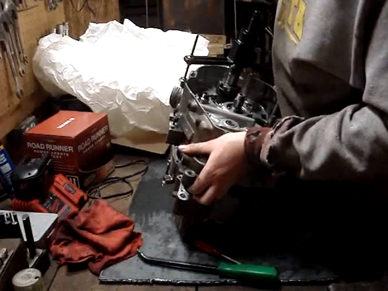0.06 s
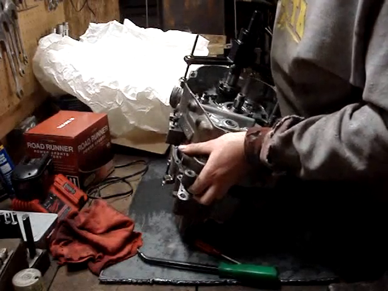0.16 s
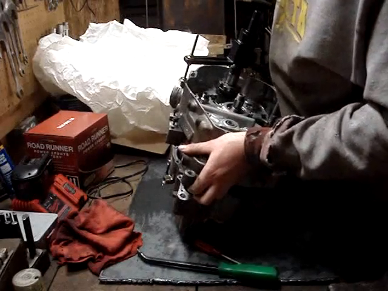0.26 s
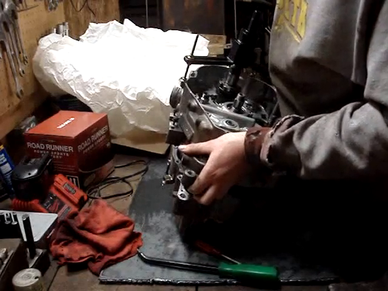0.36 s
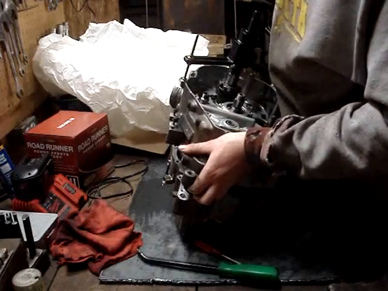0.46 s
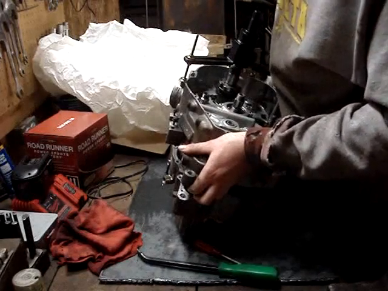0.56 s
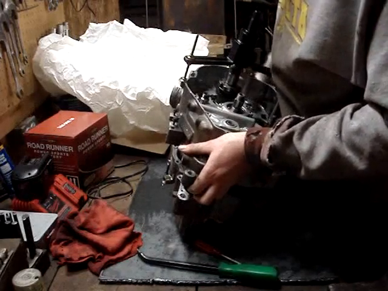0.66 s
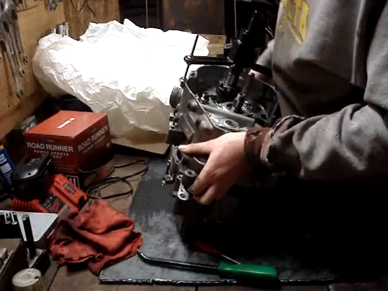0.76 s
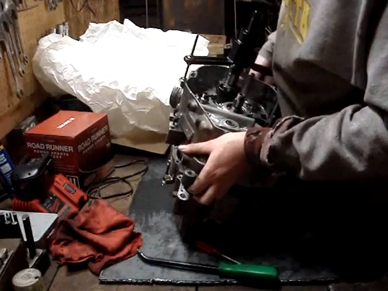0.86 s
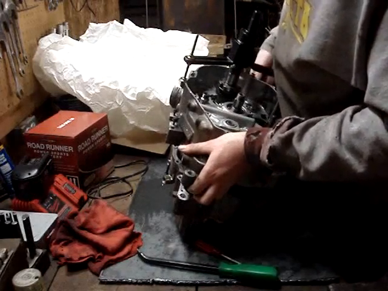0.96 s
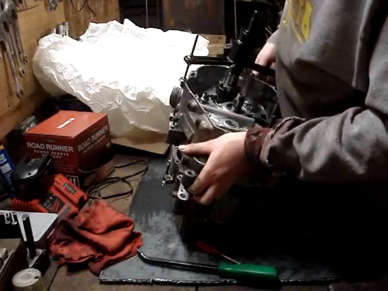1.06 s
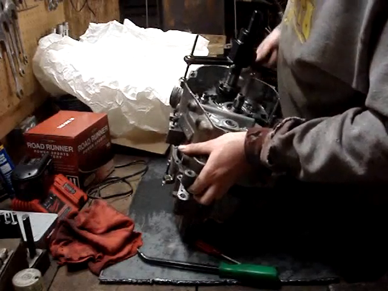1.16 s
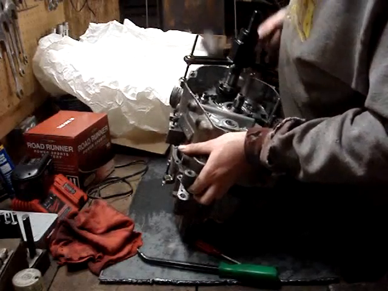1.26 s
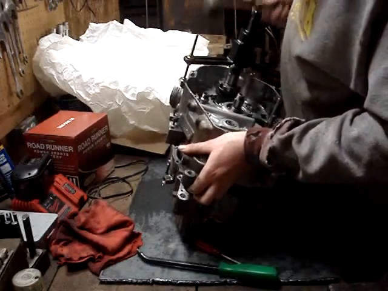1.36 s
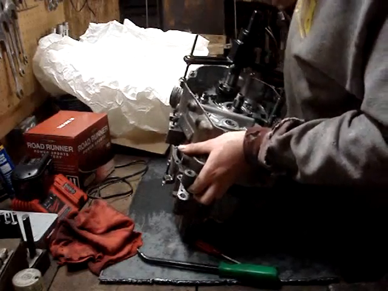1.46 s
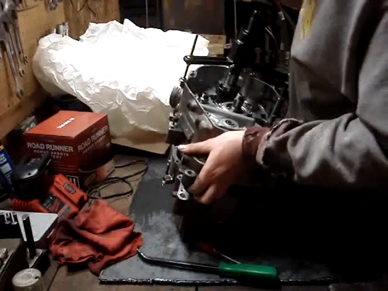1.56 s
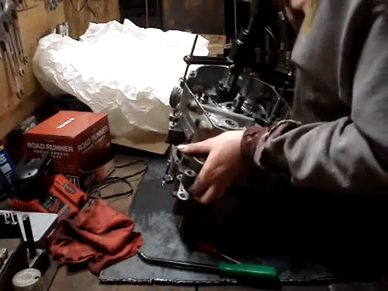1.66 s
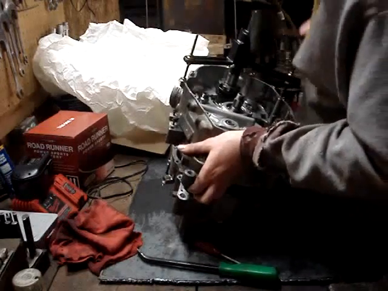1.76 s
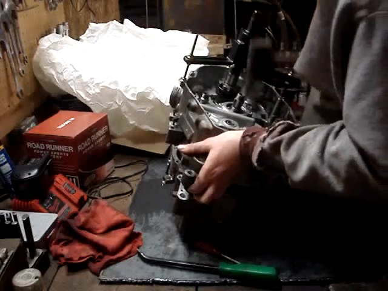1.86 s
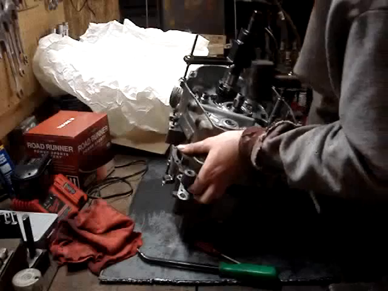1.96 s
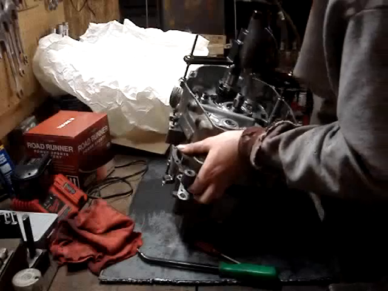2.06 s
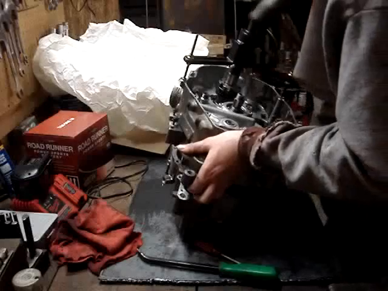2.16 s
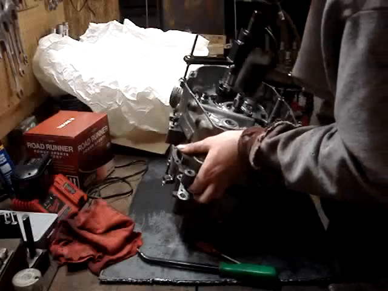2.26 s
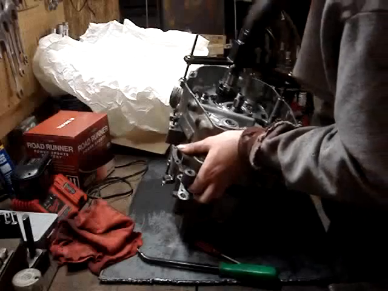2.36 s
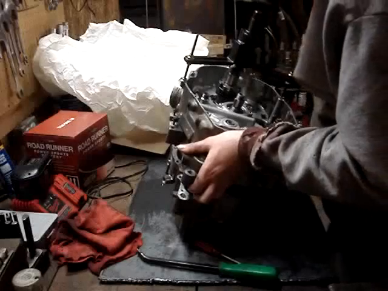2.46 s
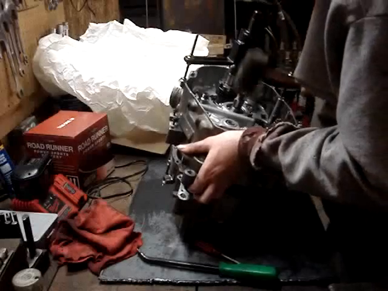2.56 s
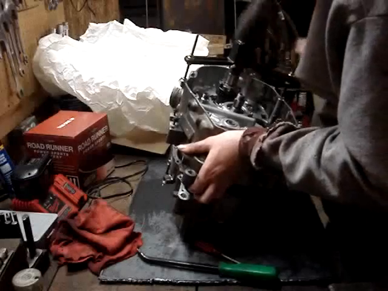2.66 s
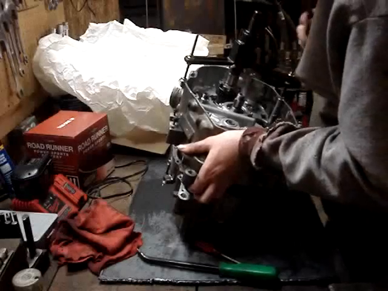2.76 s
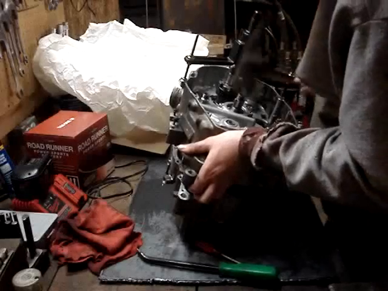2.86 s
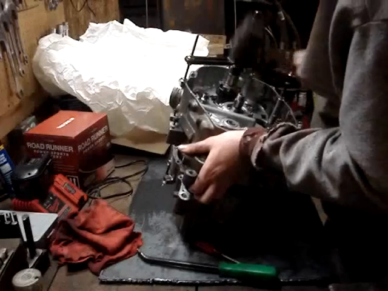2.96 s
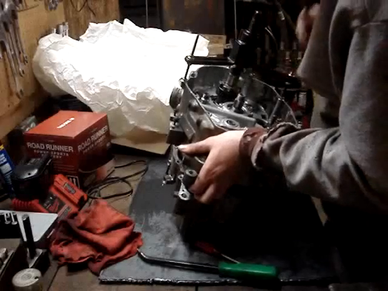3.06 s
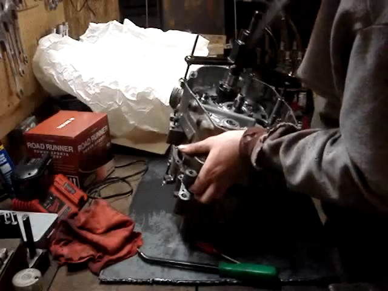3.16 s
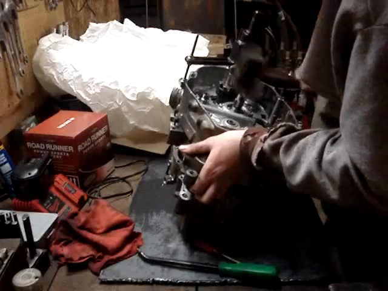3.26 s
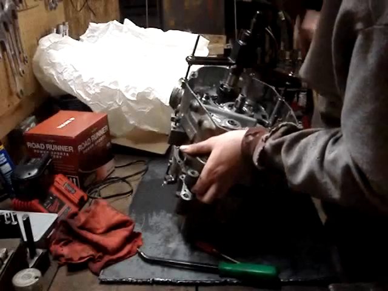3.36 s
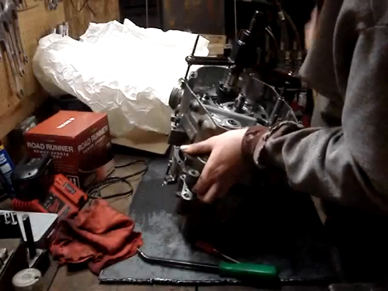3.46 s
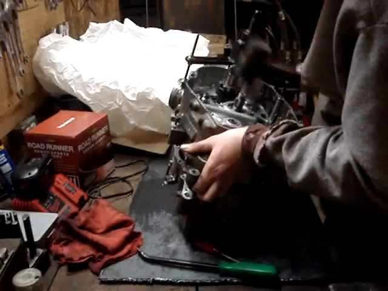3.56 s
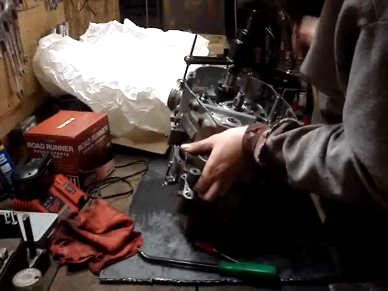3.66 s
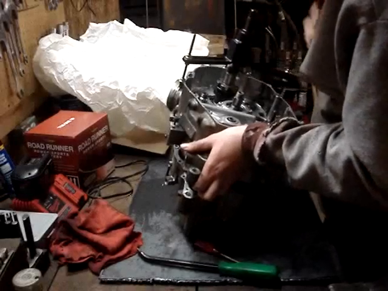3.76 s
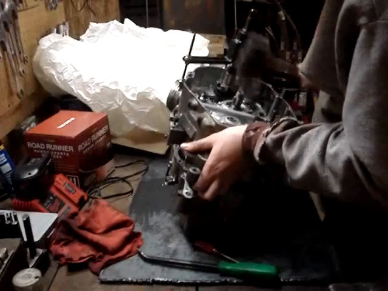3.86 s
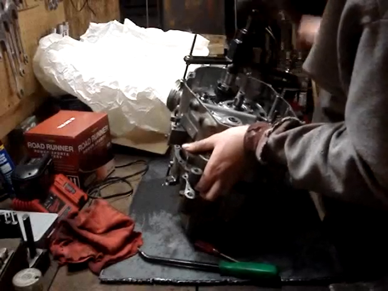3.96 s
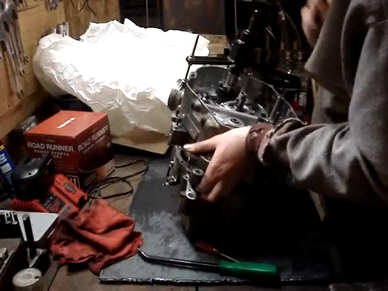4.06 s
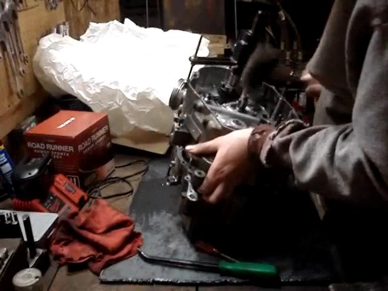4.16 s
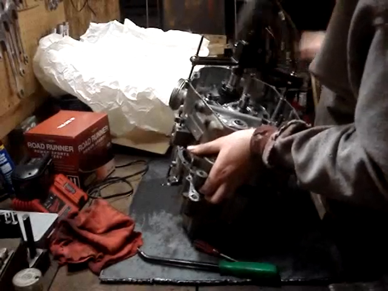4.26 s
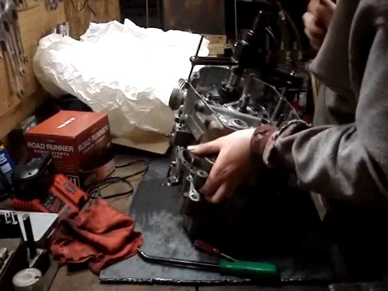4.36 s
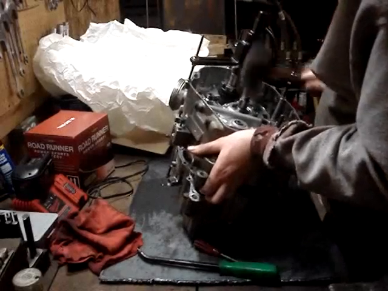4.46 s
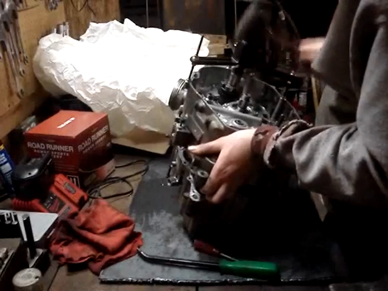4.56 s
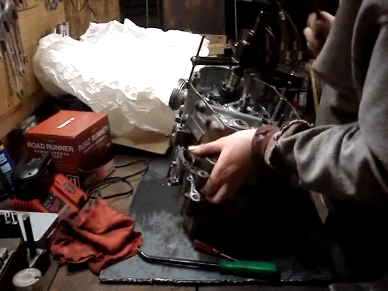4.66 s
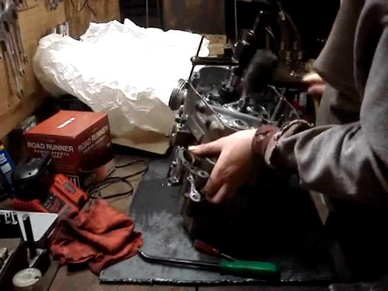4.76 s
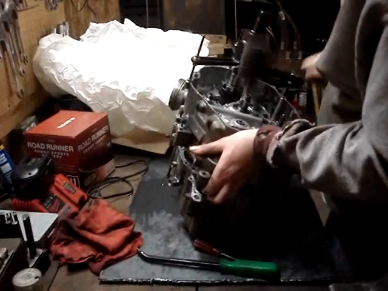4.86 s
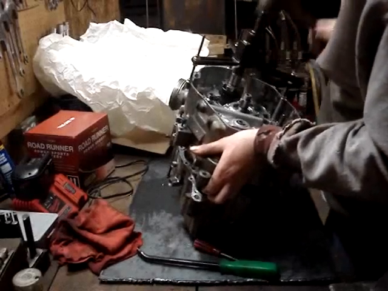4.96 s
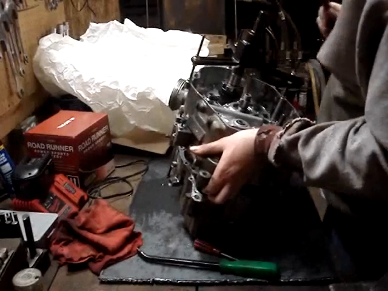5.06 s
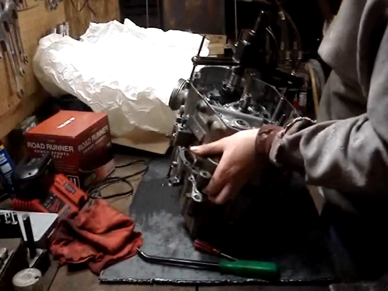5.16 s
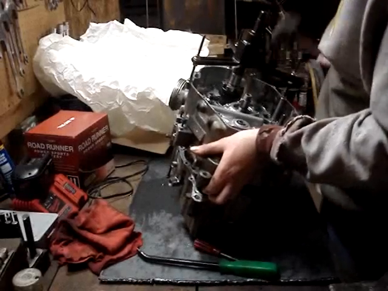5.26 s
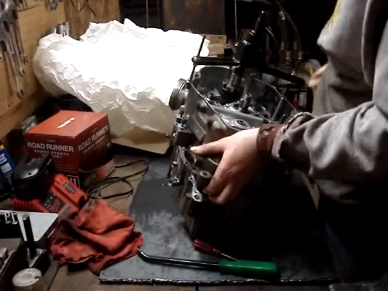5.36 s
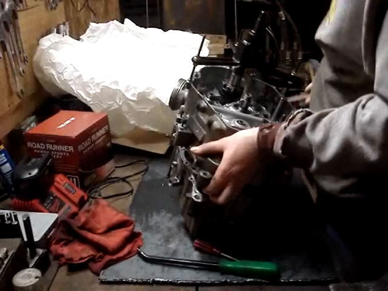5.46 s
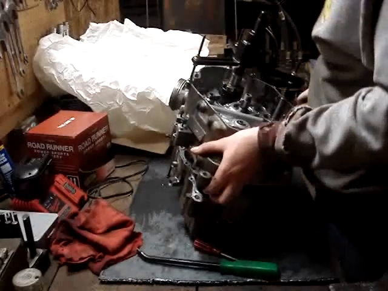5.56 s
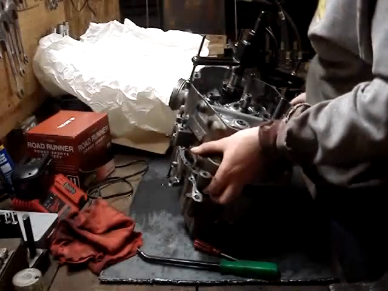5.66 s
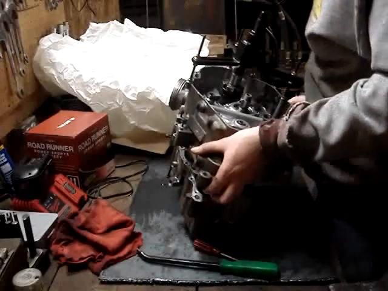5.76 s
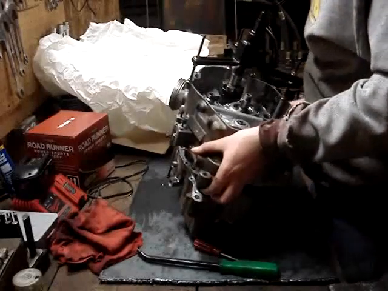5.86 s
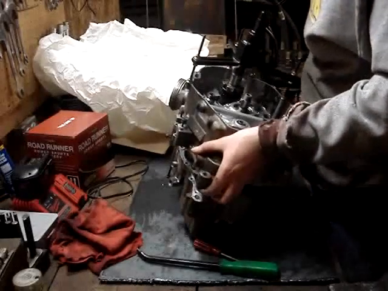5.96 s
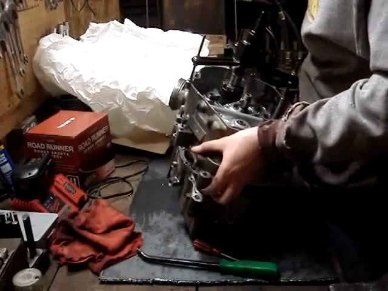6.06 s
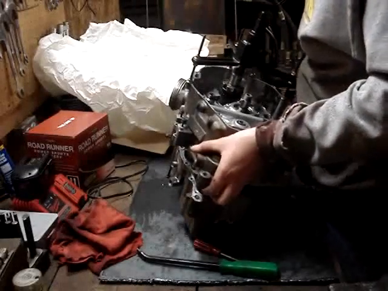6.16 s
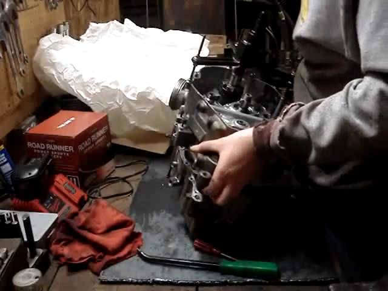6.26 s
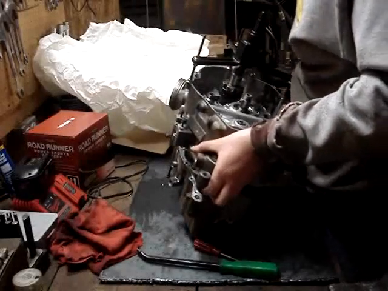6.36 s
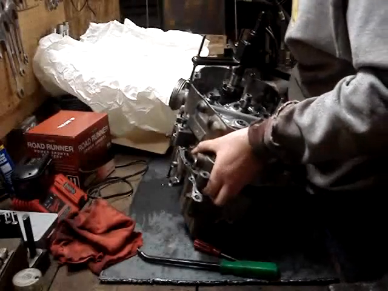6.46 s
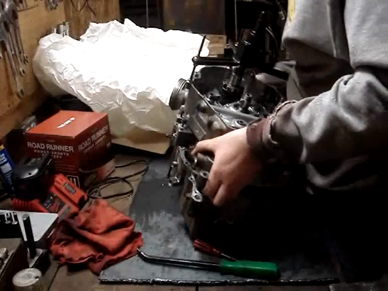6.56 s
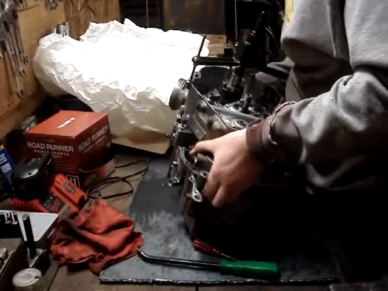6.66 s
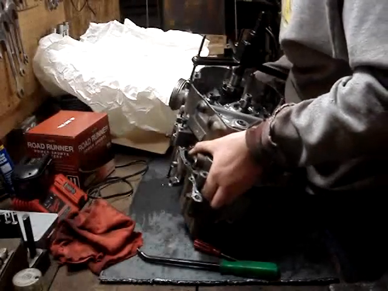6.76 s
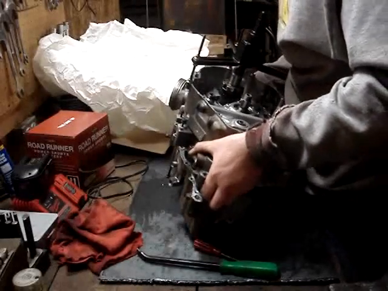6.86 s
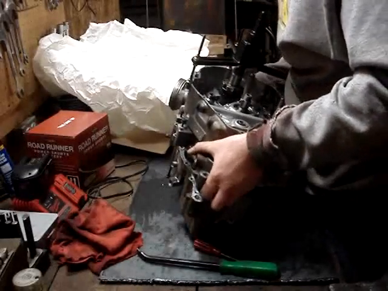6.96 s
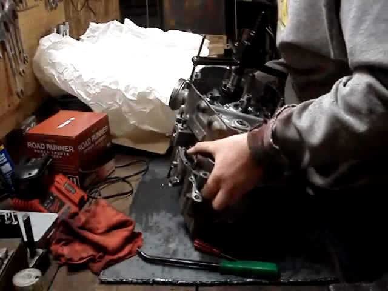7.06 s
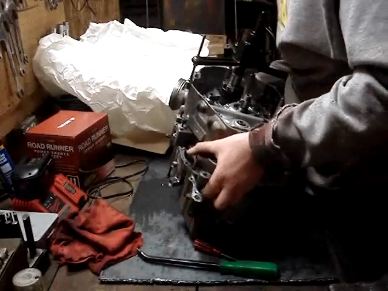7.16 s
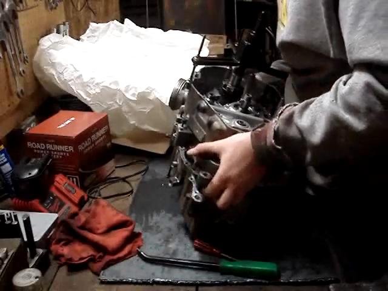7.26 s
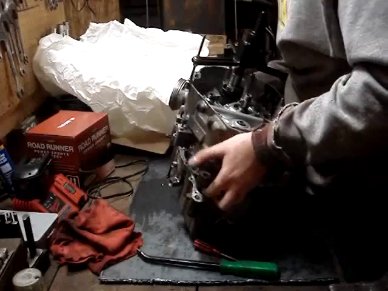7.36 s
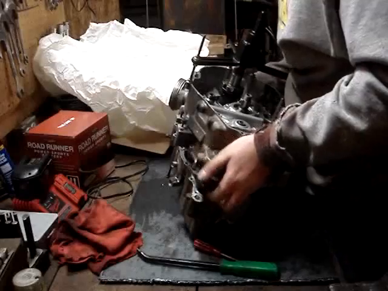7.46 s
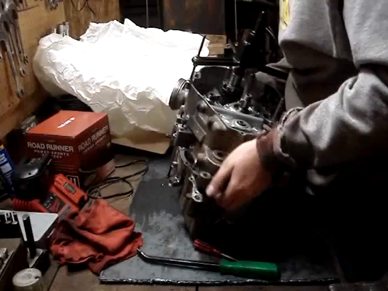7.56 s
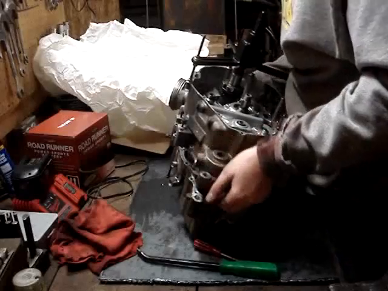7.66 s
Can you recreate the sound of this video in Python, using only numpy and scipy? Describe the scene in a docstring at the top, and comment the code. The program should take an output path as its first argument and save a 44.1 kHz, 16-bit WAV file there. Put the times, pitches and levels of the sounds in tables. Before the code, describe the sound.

In a garage with a steady hum of air, a hammer clinks twice as it is picked up, and an engine casing is bumped with a clatter. Nine hammer blows follow, about three a second, each knocking the metal, rattling loose steel parts and ringing through the room. The hammer is then put down with a clatter. One microphone at the workbench ducks at the loud hits and slowly recovers.

```python
"""A steady hum of air fills a garage, heard through one camera microphone at the workbench.
A hammer clinks twice as it is picked up, and an open engine casing is bumped. Nine hammer blows follow,
about three a second: each knocks the casing, sets loose steel parts chattering and rings through the
room. Then the hammer is put down with a clatter.
The camera's gain control ducks at every loud hit and recovers slowly."""
import numpy as np
from scipy import signal
from scipy.fft import rfft, irfft, next_fast_len
from scipy.io import wavfile
from scipy.ndimage import map_coordinates
import sys
import numpy as np
from scipy import signal
from scipy.fft import rfft, irfft, next_fast_len
from scipy.io import wavfile
from scipy.ndimage import map_coordinates

SR = 44100
rng = np.random.default_rng(int(sys.argv[2]) if len(sys.argv) > 2 else 0)


def generate_wav(signal):
    """Clip the signal to [-1, 1] and save it as 16-bit WAV at the path in sys.argv[1]."""
    frames = np.transpose(np.atleast_2d(signal))
    scaled = np.clip(frames, -1, 1) * 32767
    pcm = np.round(scaled).astype(np.int16)
    wavfile.write(sys.argv[1], SR, pcm)


N = 339834
HIT_SAMPLES = 2 ** 15  # one hit and its tail
T, HZ = np.arange(HIT_SAMPLES) / SR, np.fft.rfftfreq(HIT_SAMPLES, 1 / SR)
TOP_HZ = 10060  # the camera's band limit


def amp(db):
    """Decibels to gain."""
    return 10 ** (np.asarray(db) / 20)


def unit_rms(x):
    """x scaled to rms 1."""
    return x / np.sqrt(np.mean(x ** 2) + 1e-20)


def along(points, hz):
    """A curve of (frequency_hz, value) points, read on a log frequency axis."""
    frequencies, values = np.transpose(points)
    return np.interp(np.log(hz + 1), np.log(frequencies + 1), values)


def resonances(peaks, hz):
    """Gain of narrow peaks standing on a flat response."""
    power = sum(abs(amp(db) ** 2 - 1) / (1 + (2 * (hz - pitch) / width) ** 2)
                for pitch, width, db in peaks)
    return np.sqrt(1 + power)


def noise(colour):
    """Noise of rms 1 below the band limit, shaped by a gain at each frequency."""
    size = 2 * (len(colour) - 1)
    in_band = np.fft.rfftfreq(size, 1 / SR) < TOP_HZ
    return unit_rms(irfft(rfft(rng.standard_normal(size)) * colour * in_band, size))


def mode(hz, t60_s):
    """One damped vibration, falling 60 dB in t60_s."""
    return np.sin(2 * np.pi * hz * T) * amp(-60 * T / t60_s)


def attack(rise_s):
    """An envelope rising smoothly from 0 to 1."""
    return 1 - np.exp(-T / rise_s)


def add(track, start_s, sound):
    """Mix a sound into the track."""
    part = track[round(start_s * SR):][:len(sound)]
    part += sound[:len(part)]


# Spectrum of the air in the garage: frequency_hz, level_db
AIR_SPECTRUM = [(28, -9), (55, -21.5), (100, -11), (140, -15), (200, -5), (290, 1.5), (420, -1), (950, -1),
                (1300, -3.5), (2000, -8.5), (5000, -20), (10000, -36)]
# Room modes that the air excites: pitch_hz, width_hz, boost_db
ROOM_MODES = [(316.4, 17, 5.5), (558, 8.2, 5.5), (857, 47, 3)]

def air(level_db=-34.5):
    """Room tone all around the microphone: moving air, coloured by the garage's modes."""
    hz = np.fft.rfftfreq(2 * next_fast_len(N // 2 + 1), 1 / SR)
    colour = amp(along(AIR_SPECTRUM, hz)) * resonances(ROOM_MODES, hz)
    return amp(level_db) * noise(colour)[:N]


# Reverberation time of the garage: frequency_hz, t60_s
GARAGE_DECAY = [(60, 0.15), (200, 0.77), (600, 0.89), (1500, 0.8), (3000, 0.76), (5000, 0.59), (7000, 0.48),
                (10000, 0.29)]

def room_decay(x, start_s=0):
    """From start_s on, each frequency of x fades at the garage's own rate."""
    hz, t, spectrum = signal.stft(x, SR, nperseg=256)
    fade = amp(-60 * np.maximum(t - start_s, 0) / along(GARAGE_DECAY, hz)[:, None])
    return signal.istft(spectrum * fade, SR, nperseg=256)[1][:len(x)]


def in_room(x, wet_db):
    """The direct sound from the bench, then the answer of the walls farther off."""
    tail = room_decay(rng.standard_normal(HIT_SAMPLES)) * attack(0.03)
    return x + amp(wet_db) * signal.fftconvolve(x, tail / np.linalg.norm(tail))[:len(x)]


# The hammer's modes, in two families that answer to where it is touched:
# pitch_hz, t60_s, beat_depth (0-1), level_db, family (0 or 1)
HAMMER_MODES = [(668, .25, .2, -15, 0), (910, .33, .5, 1, 0), (2285, .7, .3, -8, 0), (1100, .015, 0, 8, 1),
                (1200, .72, .95, -.5, 1), (1265, .17, .1, -3, 1), (2686, .5, .3, -23, 1)]
# The hammer touching steel as it is lifted and laid down: start_s, tick_db, family_0_db, family_1_db
HAMMER_TOUCHES = [(0.543, -22, -23, -47), (0.828, -25.5, -25, -17), (6.312, -22.5, -24, -21)]

def hammer_clinks(beat_hz=12.4):
    """Light touches ring the hammer; its modes are split in close pairs, so they beat."""
    out = np.zeros(N)
    beat = np.sin(2 * np.pi * beat_hz * (T - .013))
    tick_colour = amp(along([(100, -16.5), (400, 4), (1200, -4.5), (2500, -16.5), (10000, -50)], HZ))
    for start_s, tick_db, *family_db in HAMMER_TOUCHES:
        ring = sum(amp(family_db[family] + db) * mode(hz, t60_s) * (1 + depth * beat)
                   for hz, t60_s, depth, db, family in HAMMER_MODES)
        ring = in_room(ring, wet_db=-21)
        tick = amp(tick_db - 60 * T / 0.42) * noise(tick_colour)
        add(out, start_s, (ring + tick) * attack(0.00078))
    return out


# Modes of the wooden bench: pitch_hz, t60_s, level_db
BENCH_MODES = [(189.4, 0.12, -14.5), (297.6, 0.09, -7.5), (383, 0.018, 10), (656, 0.051, -10)]
# Soft bumps on the bench: the casing rocking near 1.06 s, the hammer laid down near 6.28 s: start_s, level_db
BENCH_BUMPS = [(1.055, 4), (1.0711, -4), (6.278, -11), (6.319, -12)]

def bench_bumps():
    """The casing rocks on the wooden bench, and later the hammer is laid on it; each bump sets the wood's modes
    sounding."""
    out = np.zeros(N)
    wood = sum(amp(db) * mode(hz, t60_s) for hz, t60_s, db in BENCH_MODES) * attack(0.0077)
    for start_s, level_db in BENCH_BUMPS:
        add(out, start_s, in_room(amp(level_db) * wood, wet_db=-4.5))
    # one deep sub-bass thump in the microphone or limiter as the loud clatter hits
    sub_thump = mode(hz=9.8, t60_s=0.27) + amp(-7) * mode(hz=30, t60_s=.2)
    add(out, 1.088, amp(-9) * sub_thump)
    return out


# The casing's main modes: pitch_hz, t60_s, level_db, family (0 thud, 1 clank)
CASING_MODES = [(455, .08, -10, 0), (530, .05, 0, 0), (588, .7, -16, 0), (638, .6, -19, 0),
                (1290, .035, -2, 1), (1308, .75, -25, 1), (1760, .05, -7, 1), (2700, .03, -12, 1)]

def casing_knock(thud_db, clank_db):
    """The whole casing thuds and its wall clanks; the least damped modes sing on."""
    out = np.zeros(HIT_SAMPLES)
    for hz, t60_s, db, family in CASING_MODES:
        wander_hz = rng.normal(0, .5 / t60_s)  # broad modes differ most from blow to blow
        out += amp((thud_db, clank_db)[family] + db) * mode(hz + wander_hz, t60_s)
    bass_cut = signal.butter(2, 180, "high", fs=SR)  # the knock carries little bass
    return signal.lfilter(*bass_cut, out * attack(0.0017))


# The dense ring of many overlapping modes: frequency_hz, level_db
RING_SPECTRUM = [(30, -24), (90, -25), (140, -20.5), (230, -15.5), (400, -8.5), (750, -1.74), (1400, -1.3),
                 (2200, -1), (3500, -0.6), (5500, -4), (7000, -10), (8300, -13.5), (10000, -17)]
# Resonances of the cast casing, standing above that ring: pitch_hz, boost_db
CASING_PEAKS = [(245, 4), (311, 6), (466, 3), (584, 8), (638, 7), (835, 2), (913, 2), (1180, 2), (1240, 4),
                (1308, 7), (1435, 3), (1521, 4), (1795, 4), (2145, 5), (2738, 3), (2880, 3), (3440, 4),
                (3499, 5), (3598, 4), (3895, 5), (4190, 5), (4336, 5)]

def casing_colour(tilt_db_per_octave, pivot_hz=1300, width_hz=20, spread_db=2.4, spacing_hz=38):
    """Spectrum of one hit: each lands a little differently and favours its own higher modes."""
    tilt_db = tilt_db_per_octave * np.log2(np.clip(HZ, 450, 8200) / pivot_hz)
    peaks = resonances([(hz, width_hz, db) for hz, db in CASING_PEAKS], HZ)
    ripple = map_coordinates(rng.standard_normal(2000), [HZ / spacing_hz], mode="wrap")
    crowding = np.clip(HZ / 1600, 0, 1)  # the few low modes answer much alike
    return amp(along(RING_SPECTRUM, HZ) + tilt_db + spread_db * crowding * ripple) * peaks


def chatter(per_second=120, depth=.7, decay_s=.002):
    """Envelope of loose parts striking at random, each contact dying in a few milliseconds."""
    hits = (rng.random(HIT_SAMPLES) < per_second / SR) * rng.uniform(.4, 1, HIT_SAMPLES)
    contacts = signal.lfilter([1], [1, -np.exp(-1 / (decay_s * SR))], hits)
    return unit_rms(1 + depth * contacts)


def strike(chatter_s, tilt_db_per_octave, thud_db, clank_db, low_thump_db):
    """One impact: a knock, a moment of chattering metal, then the ring drops away into the room."""
    colour = casing_colour(tilt_db_per_octave)
    fade = amp(-60 * np.maximum(T - chatter_s, 0) / 0.27)
    accent = 1 + 0.5 * np.exp(-T / 0.021)
    metal = chatter() * noise(colour) * fade * accent
    walls = amp(along([(500, 0), (1500, -1.5), (4000, -7), (9000, 0)], HZ))
    room = room_decay(noise(colour * walls), chatter_s) * attack(0.029)
    # a low thump in the microphone or limiter at each hit
    low_thump = mode(hz=27, t60_s=0.072) + amp(-7) * mode(hz=79, t60_s=0.1)
    onset = np.clip(T / 0.0031, 0, 1)
    out = (amp(-2.5) * metal + amp(-6) * room) * onset + amp(low_thump_db) * low_thump
    add(out, 0.001, casing_knock(thud_db, clank_db))
    return out


# Tools picked up and put down: start_s, strength_db, chatter_s, tilt_db_per_octave, clank_db
TOOL_HANDLING = [(1.088, -3, 0.081, 0, -10), (6.279, -18.5, .027, -3.5, -16), (6.307, -14, 0.045, -0.5, -5),
                 (6.496, -7, 0.018, -1.86, 13.5)]

def tool_clatters():
    """Handled tools rattle against the casing with little weight behind them."""
    out = np.zeros(N)
    for start_s, strength_db, chatter_s, tilt, clank_db in TOOL_HANDLING:
        hit = strike(chatter_s, tilt, thud_db=-10, clank_db=clank_db, low_thump_db=-25)
        add(out, start_s, amp(strength_db) * hit)
    return out


# Modes of the loose steel parts: pitch_hz, level_db
STEEL_MODES = [(1200, -3), (1980, -3), (2220, -3), (2670, -2), (2880, -2), (3230, -3), (3499, -1),
               (3810, -1), (3895, 0), (4045, -2), (4336, -1), (4807, 5), (5060, -2), (5140, -3), (5291, 0),
               (5815, -1), (6002, 0), (6360, 1), (6645, -3), (7262, -2), (7517, 0)]
# Those parts landing again or shifting: start_s, level_db, centre_hz
STEEL_LANDINGS = [(1.098, -7, 5200), (1.118, -8.5, 5600), (2.746, -1.5, 4140), (3.043, -9, 5000),
                  (3.070, -2, 4670), (4.369, 0.5, 5150), (4.639, -17, 4200), (4.668, -2.5, 5430),
                  (6.312, -11.5, 3660), (7.077, -32, 1090), (7.64, -41.5, 7800)]

def steel_rebounds(half_width_octaves=0.39):
    """Small steel parts fall back: a short scrape, and a jangle of the modes near their own pitch."""
    def band(hz, centre_hz):
        return 1 / (1 + (np.log2((hz + 1) / centre_hz) / half_width_octaves) ** 2)

    out = np.zeros(N)
    mode_hz, mode_db = np.transpose(STEEL_MODES)
    rings = np.array([mode(hz, t60_s=0.16) for hz in mode_hz])
    fade = amp(-60 * T / 0.08) + amp(-6 - 60 * T / .5)
    for start_s, level_db, centre_hz in STEEL_LANDINGS:
        weights = amp(mode_db + rng.normal(0, 2.5, len(rings))) * band(mode_hz, centre_hz)
        weights *= rng.choice([-1, 1], len(rings))
        jangle = weights / np.linalg.norm(weights) @ rings
        scrape = noise(band(HZ, centre_hz)) * fade
        add(out, start_s, amp(level_db) * (amp(-5.5) * scrape + amp(3) * jangle) * attack(0.00076))
    return out


# Hammer blows on the casing: start_s, strength_db, chatter_s, tilt_db_per_octave
HAMMER_BLOWS = [(2.402, -11.5, .009, -4), (2.703, 3.5, 0.031, -2), (3.02, 0.5, 0.035, 0.24),
                (3.345, -1, 0.024, 0.2), (3.676, 6, 0.043, -.5), (3.99, 2.5, 0.049, -1.73),
                (4.303, 2.5, 0.066, -1), (4.614, 1, 0.052, -1.5), (4.907, 2.5, 0.049, -1.6)]

def hammer_blows(seating_s=(3.5, 3.95)):
    """As the driven part reaches its seat, the blows turn solid: more thud and clank, less low thump."""
    out = np.zeros(N)
    for start_s, strength_db, chatter_s, tilt in HAMMER_BLOWS:
        seated = np.interp(start_s, seating_s, [0, 1])
        thud_db = -5 - 3.6 * tilt + 5.5 * seated  # dull blows thud more
        hit = strike(chatter_s, tilt, thud_db, clank_db=5 + 8 * seated, low_thump_db=-15.5 - 10 * seated)
        add(out, start_s, amp(strength_db) * hit)
    return out


def scene():
    """Everything at the garage workbench, heard by one microphone."""
    return (hammer_blows() + tool_clatters() + steel_rebounds() + bench_bumps()
            + hammer_clinks() + air())[None]


def running_level(x, follow_s):
    """Rms of x over the last moments."""
    keep = np.exp(-1 / (follow_s * SR))
    return np.sqrt(signal.lfilter([1 - keep], [1, -keep], x ** 2))


def gain_control(x, threshold_db=-14, recover_s=1.43, start_duck_db=2.5):
    """Loud sounds push the gain down at once; it creeps back, and the room tone swells again."""
    over_db = 20 * np.log10(np.maximum(running_level(x, follow_s=0.015) / amp(threshold_db), 1))
    recovery = np.exp(-np.arange(N) / SR / recover_s)
    duck_db = recovery * np.maximum.accumulate(np.maximum(over_db / recovery, start_duck_db))
    return x * amp(-duck_db)


def limiter(x, ceiling_db=-11.5):
    """The first milliseconds pass, then the level is held near the ceiling."""
    overload = running_level(x, follow_s=0.0042) / amp(ceiling_db)
    return x / (1 + overload ** 6) ** (1 / 6)


def band_limit(x):
    """A steep low-pass at the top of the camera's band."""
    size = next_fast_len(len(x) + 8192)
    hz = np.fft.rfftfreq(size, 1 / SR)
    return irfft(rfft(x, size) / (1 + (hz / TOP_HZ) ** 160), size)[:len(x)]


def record(dry):
    """The camera ducks and limits loud hits, adds its own hiss, rounds the peaks and cuts the top."""
    hiss = amp(-59) * rng.standard_normal(N)
    held = limiter(gain_control(dry[0])) + hiss
    rounded = held / (1 + np.abs(held / .8) ** 4) ** (1 / 4)
    return band_limit(rounded)[None]


dry = scene()
out = record(dry)
generate_wav(out)
```